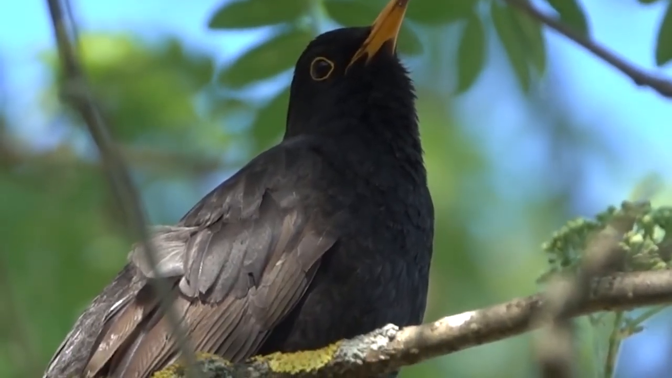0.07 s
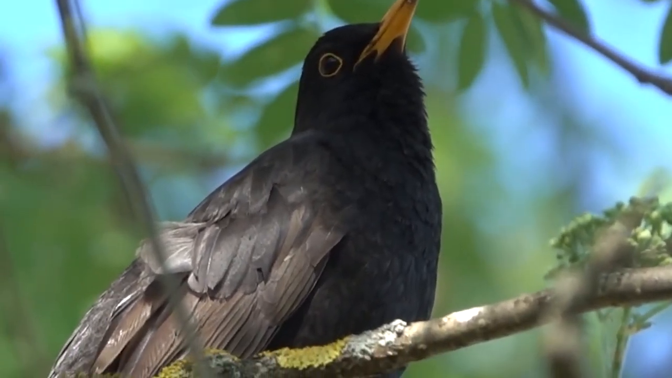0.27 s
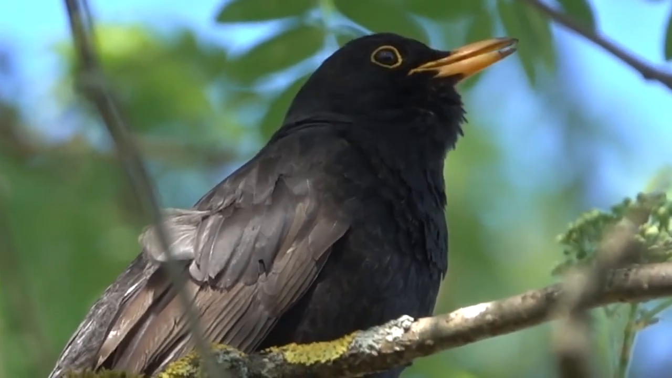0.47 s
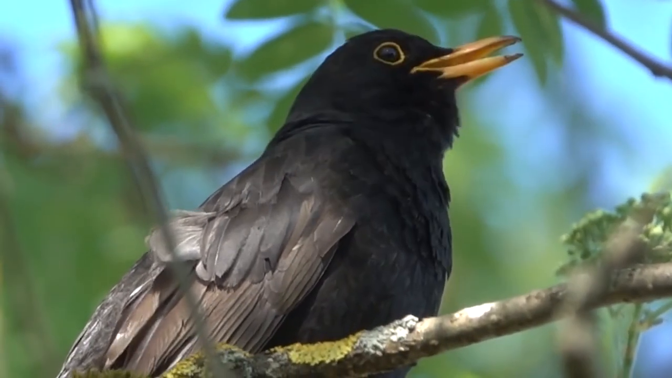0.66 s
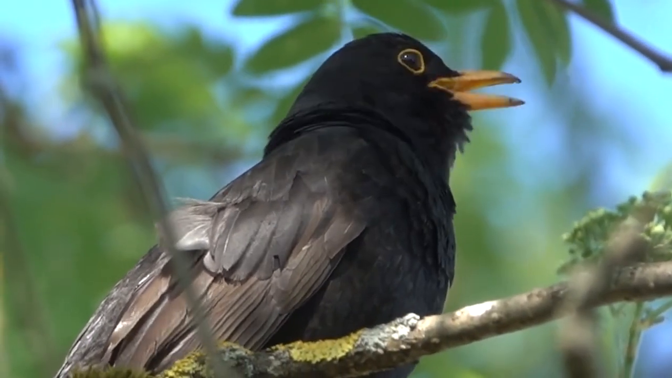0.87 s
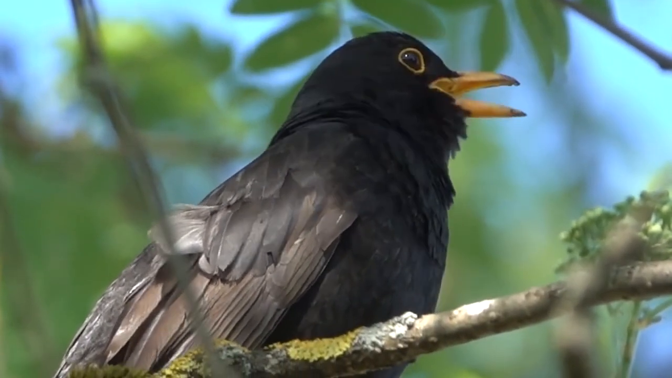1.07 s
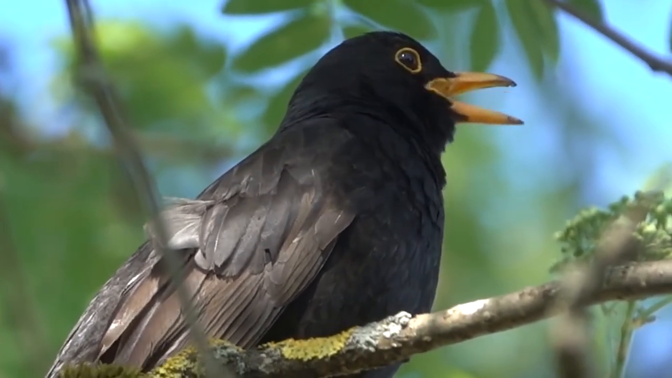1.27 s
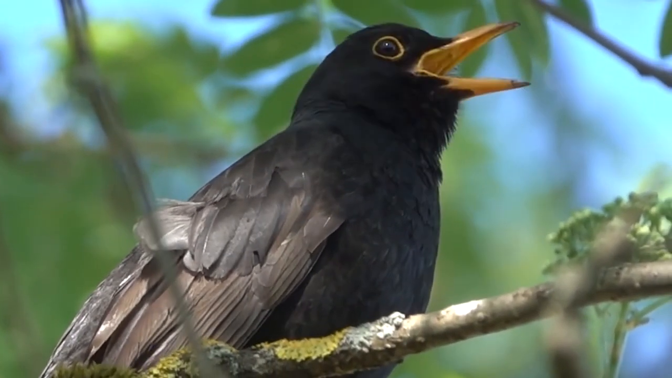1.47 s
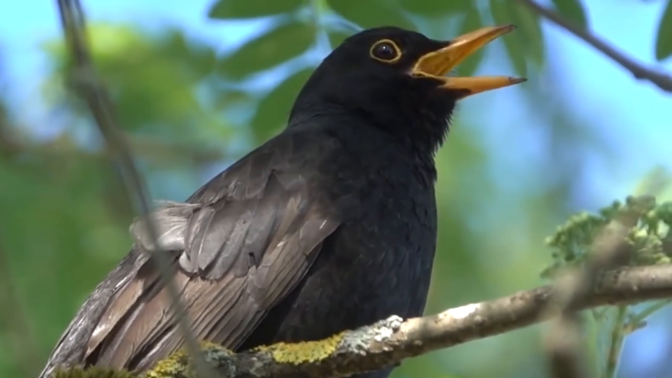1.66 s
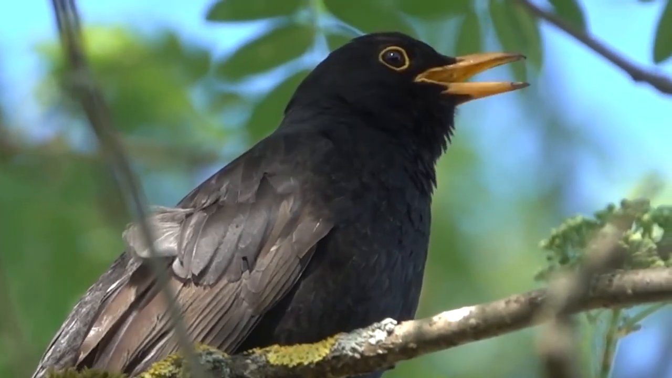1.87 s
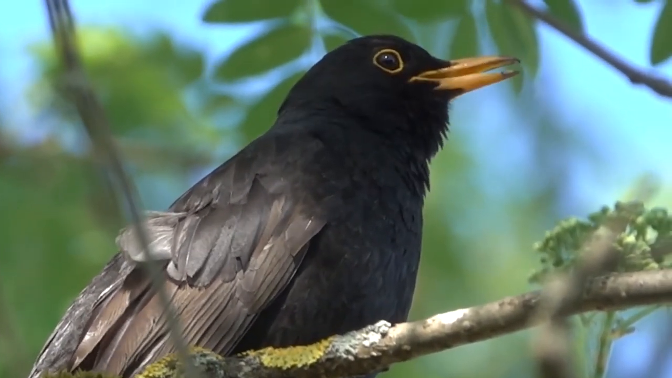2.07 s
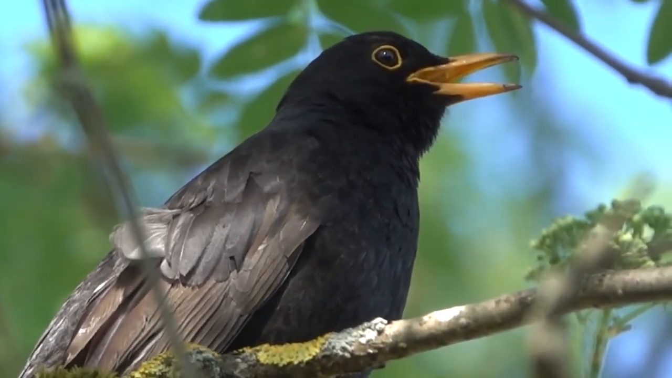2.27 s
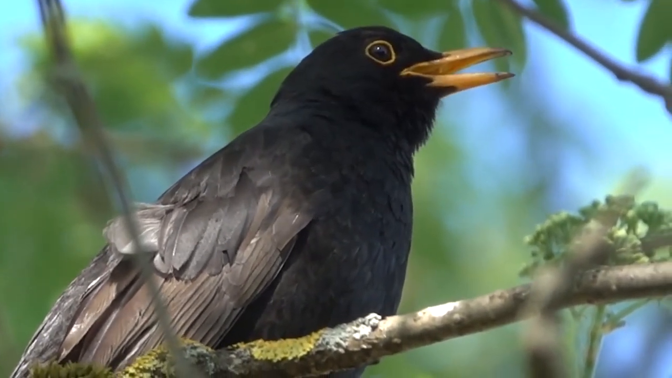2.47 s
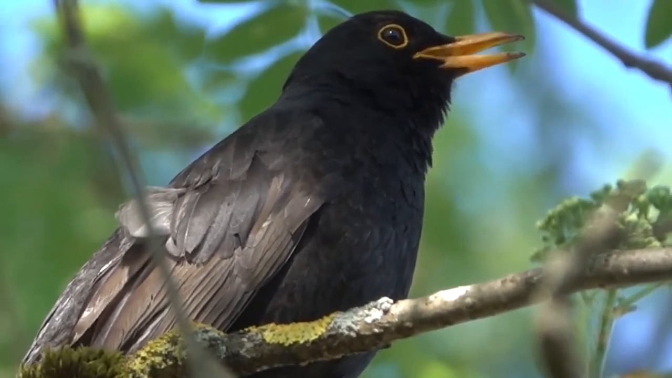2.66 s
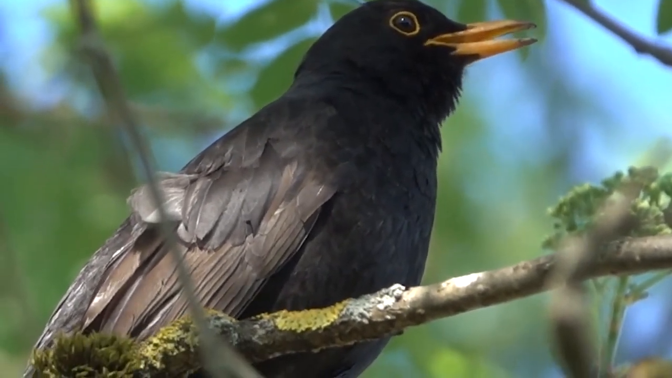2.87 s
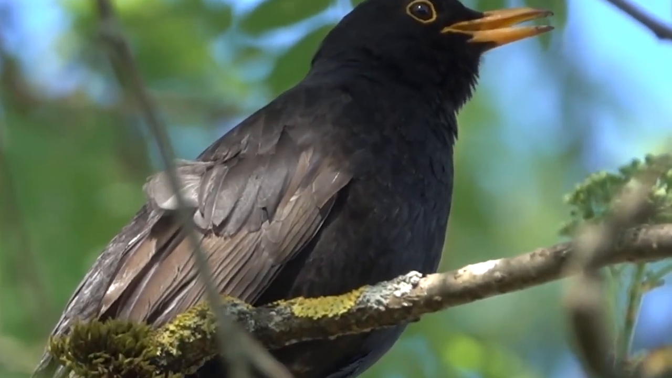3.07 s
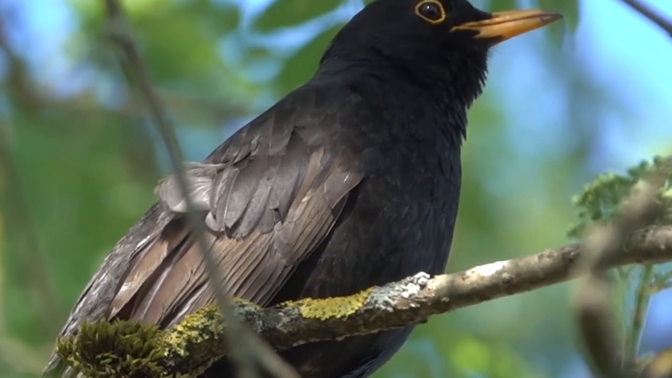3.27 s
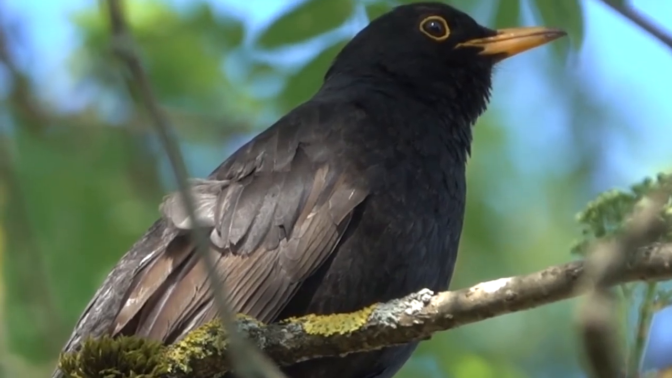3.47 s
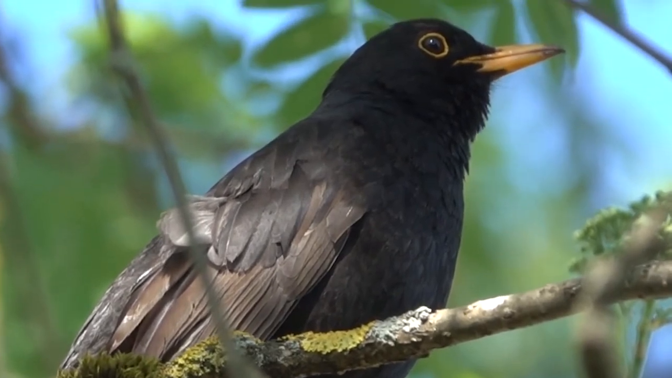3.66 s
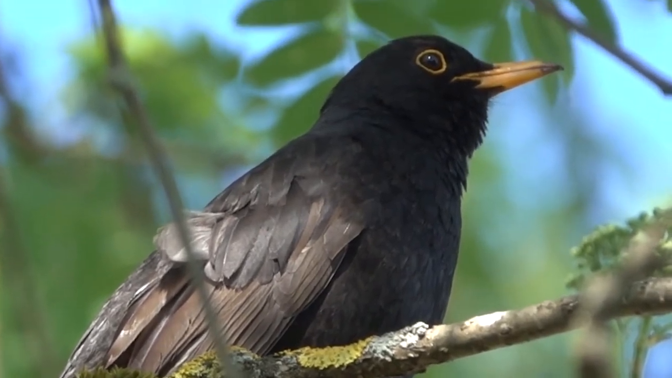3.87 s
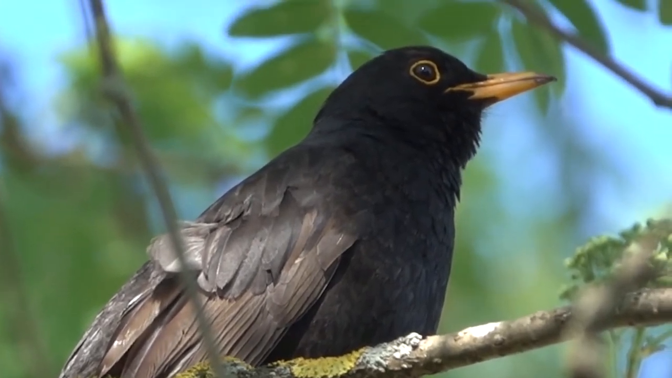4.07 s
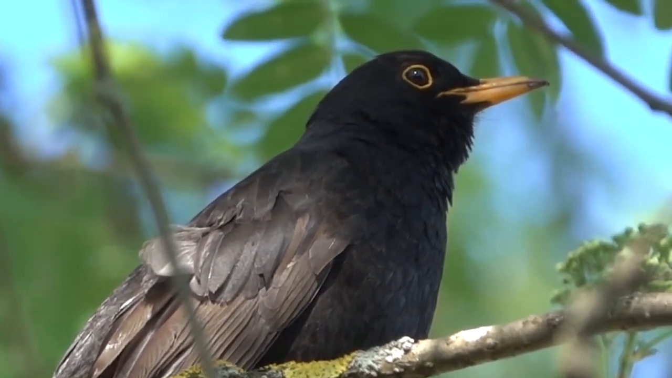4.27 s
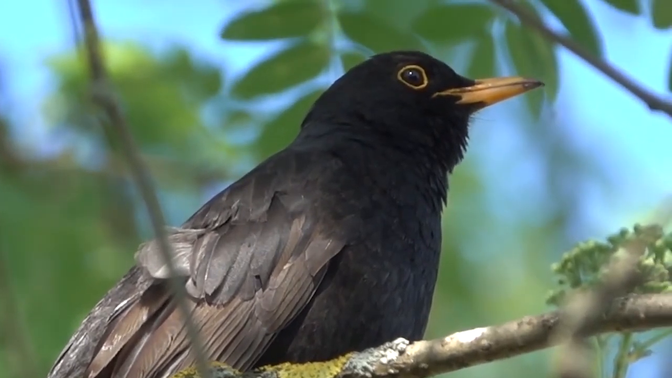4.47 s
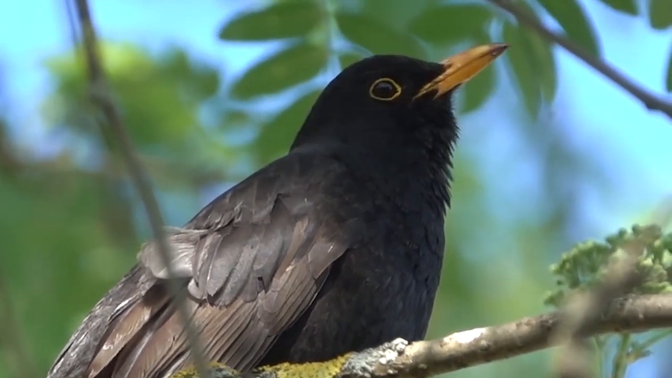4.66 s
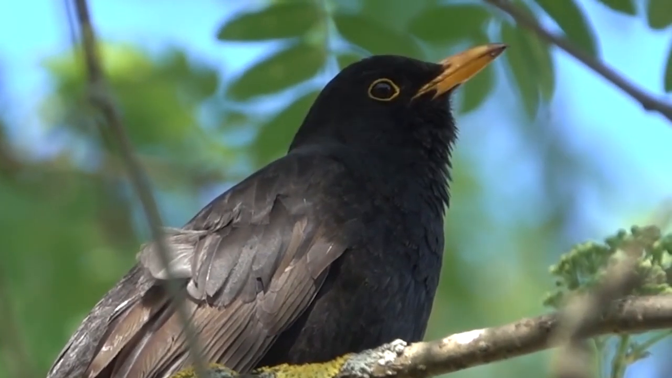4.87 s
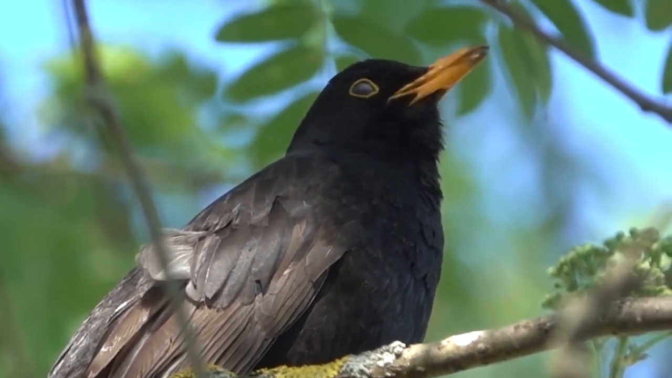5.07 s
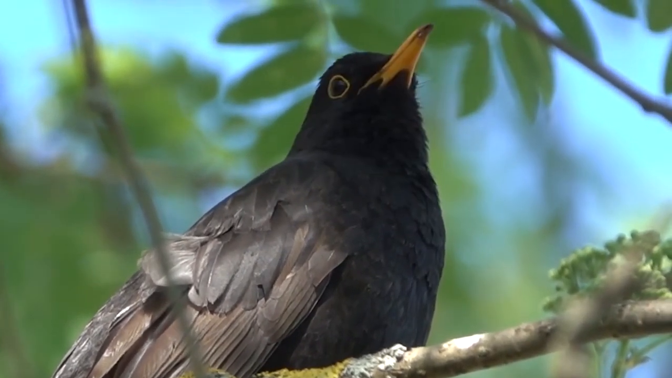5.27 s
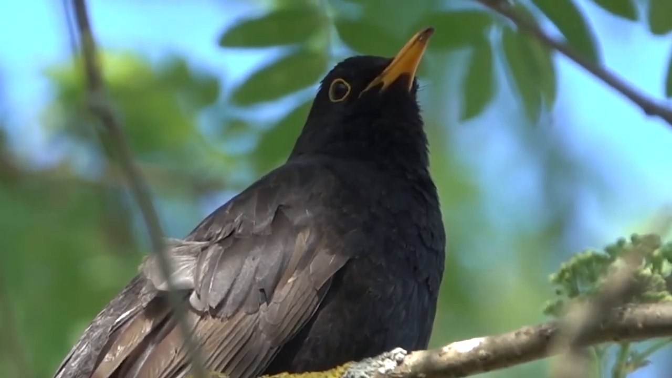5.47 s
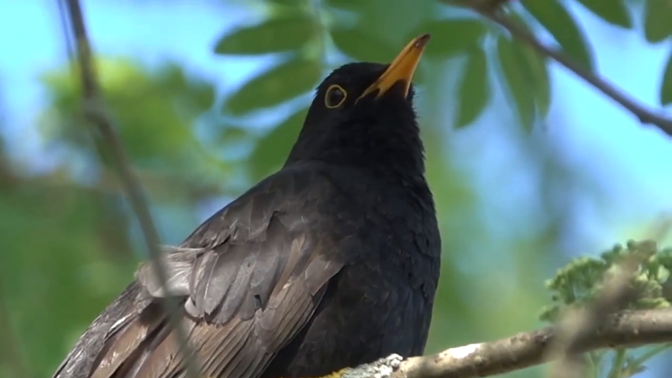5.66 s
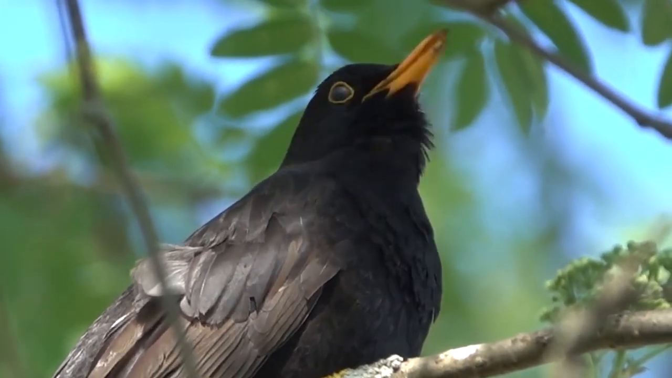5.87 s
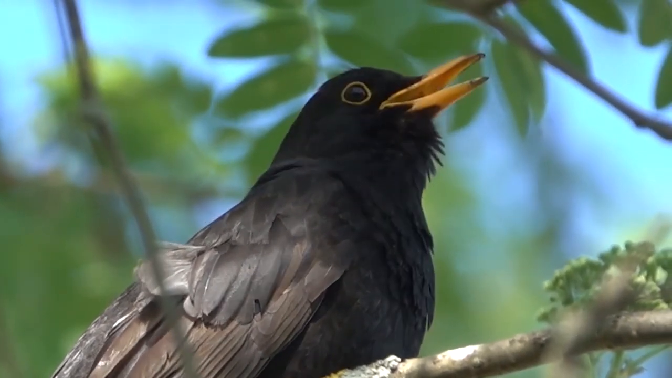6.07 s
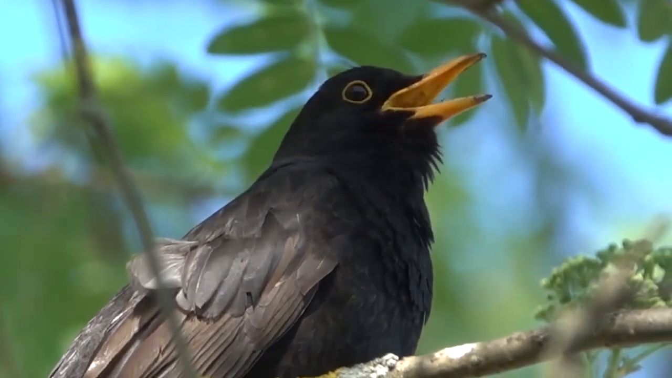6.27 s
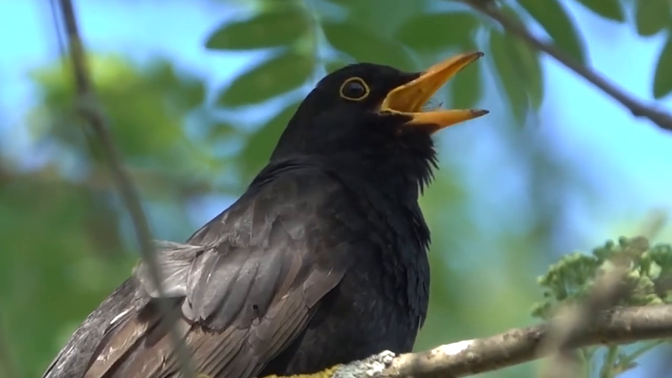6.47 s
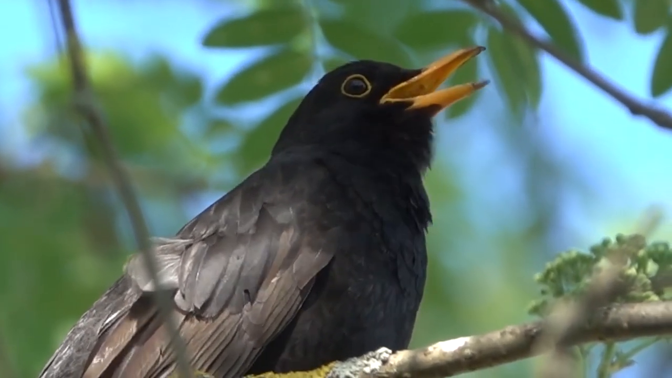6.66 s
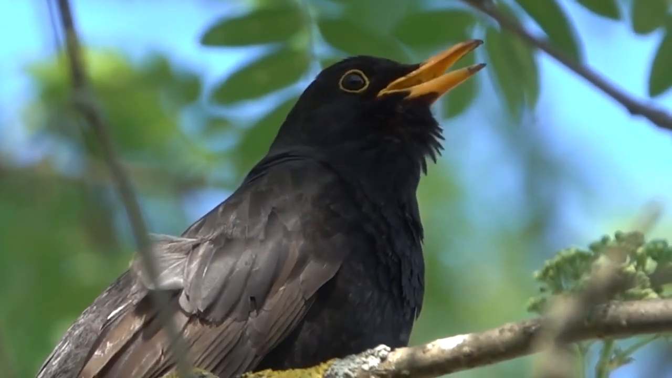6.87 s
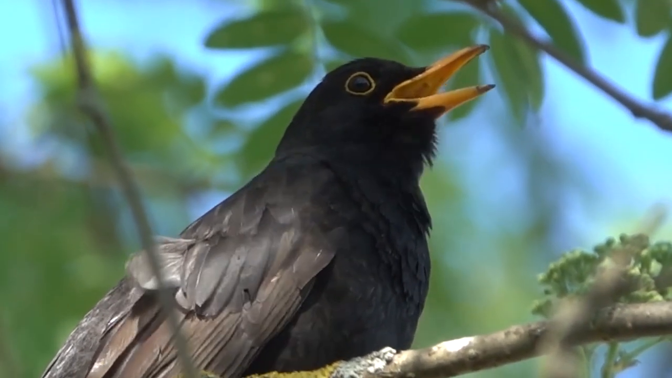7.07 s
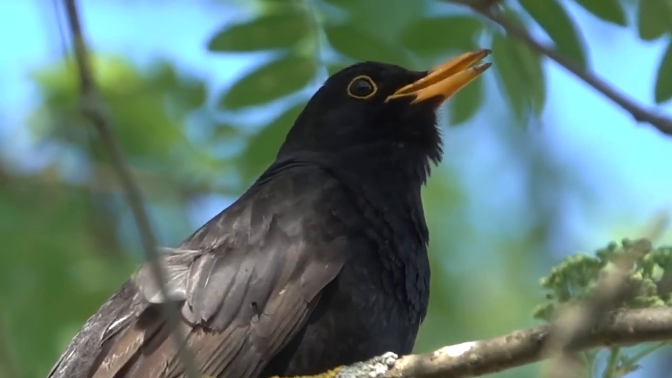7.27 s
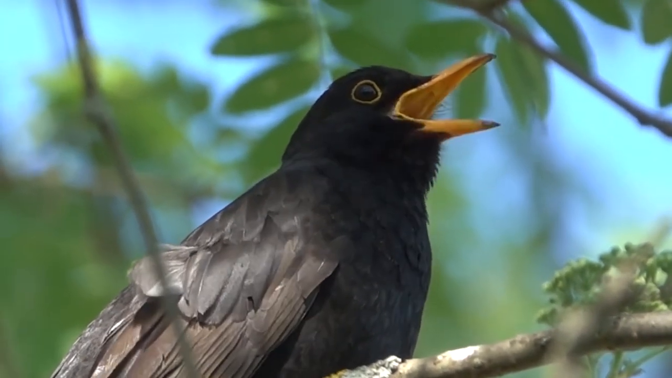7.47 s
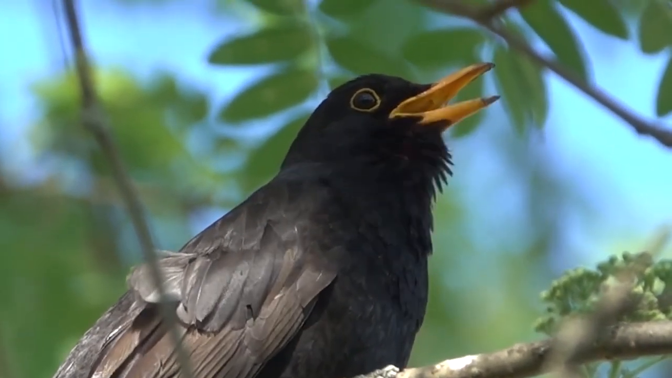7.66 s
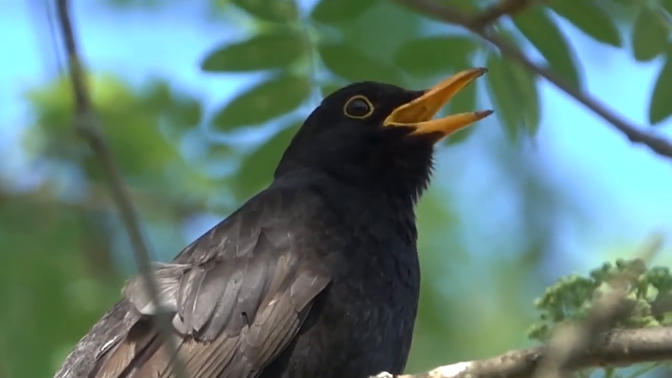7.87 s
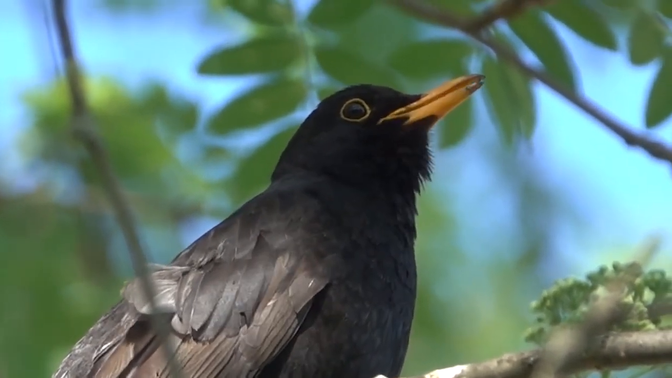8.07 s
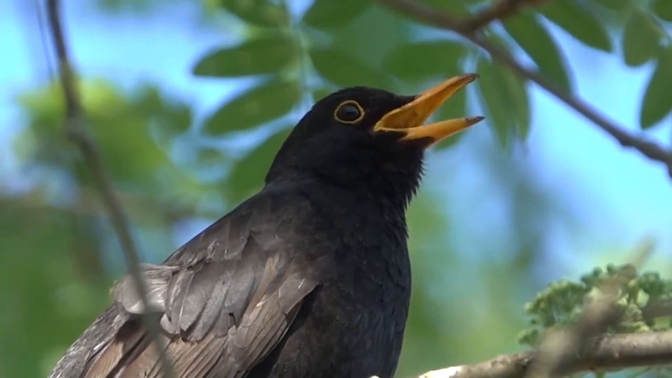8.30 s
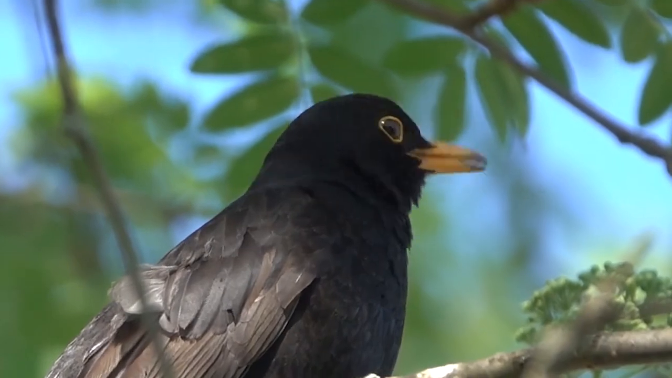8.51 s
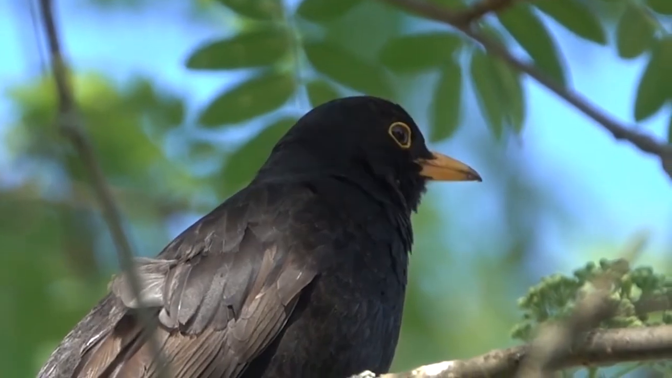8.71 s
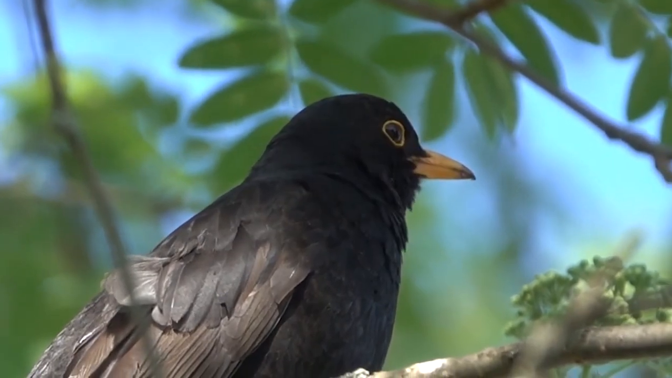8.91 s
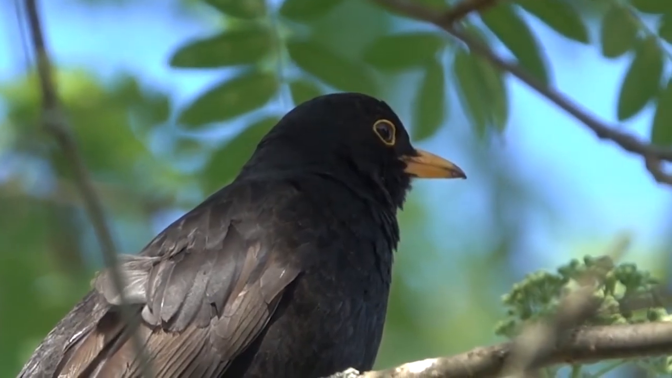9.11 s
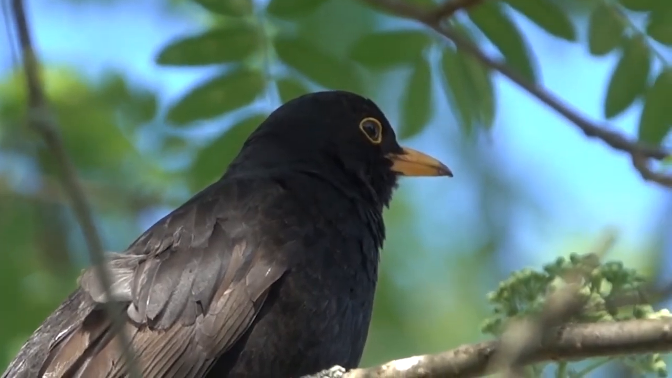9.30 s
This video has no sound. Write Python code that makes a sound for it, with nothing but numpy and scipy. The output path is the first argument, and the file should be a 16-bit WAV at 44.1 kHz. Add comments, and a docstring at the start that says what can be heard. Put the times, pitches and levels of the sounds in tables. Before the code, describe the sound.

A faint, even outdoor hush runs throughout, with small bent whistles and chirps from distant birds blurred by woodland echo. At about 0.5 s a close blackbird begins with mellow, fluty, quavering notes, scooping upward until 1.1 s. After a thin chirp, a hoarse run of rapid squeaks comes at 1.4 to 1.8 s, then a sharp downward slide at 2 s, a fine high trill around 2.4 s, a peaked squeak at 2.6 s and a fading twitter to 3.2 s. Only distant birds are heard until 5.9 s, when a second phrase opens softly; a strong clear flute note follows at 6.3 to 6.5 s, a high falling note, then quavering rolls to 7.3 s. A nasal rise clears near 7.7 s, scratchy chips snap at 7.9 to 8.05 s, and thin high notes end by 8.5 s. Far chirps continue; a tiny dry tick sounds at 9.3 s.

```python
"""A low, even outdoor hush of shaped noise runs throughout, with bent far-off whistles and their wood echo.
From about 0.5 s to 3.2 s a blackbird close by sings fluty, quavering whistles that break into squeaks and trills.
After a pause it sings a second phrase, about 5.9 s to 8.5 s; one dry, ringing tick follows near the end.
The two sides of its syrinx are gliding tones, alone or together; leaves and trunks scatter them into echoes."""
import sys
import numpy as np
from scipy import signal
from scipy.fft import rfft, irfft, next_fast_len
from scipy.io import wavfile
from scipy.ndimage import uniform_filter1d, map_coordinates

SR = 44100
rng = np.random.default_rng(int(sys.argv[2]) if len(sys.argv) > 2 else 0)


def inscribe(sig):
    """Save sig as 16-bit PCM at rate SR to the path in sys.argv[1].

    A 1-D sig is mono; a 2-D sig holds one channel per row.
    Samples are clipped to [-1, 1] before scaling.
    """
    pcm = np.round(np.clip(np.atleast_2d(sig).T, -1, 1) * 32767)
    wavfile.write(sys.argv[1], SR, pcm.astype(np.int16))


N = 411883
TIME = np.arange(N) / SR
TOP_HZ = 11000  # upper limit of the sound

# sung notes of the first phrase, each a contour of: t/s, f/Hz, level/dB
ARCH = [(0.506, 1473, -41.5), (0.51, 1478, -35), (0.552, 1796, -22.5), (0.572, 1896, -27.5),
        (0.614, 1879, -22), (0.636, 1855, -27), (0.662, 1842, -22.5), (0.71, 1783, -20), (0.733, 1740, -33)]
WARBLE = [(0.793, 2020, -42), (0.807, 1910, -26), (0.825, 1710, -20.5), (0.835, 1738, -28.5),
          (0.857, 1757, -19.5), (0.889, 1858, -22), (0.897, 2074, -25.5), (0.935, 2094, -19.5),
          (0.944, 2139, -27.5)]
SCOOP = [(0.992, 2710, -19.5), (1.02, 2317, -16.5), (1.04, 2222, -22), (1.048, 2251, -19.5),
         (1.062, 2489, -18.5), (1.088, 2730, -19), (1.104, 2830, -26.5), (1.112, 2793, -27)]
SQUEAL_LOW = [(1.674, 3370, -32.5), (1.686, 3525, -31), (1.702, 3423, -39), (1.722, 3570, -33.5),
              (1.742, 3543, -36.5), (1.768, 3125, -35.5)]
SQUEAL_HIGH = [(1.68, 7330, -39.5), (1.712, 8200, -40.5), (1.756, 8084, -46), (1.77, 7872, -58)]
SLIDE = [(1.96, 4562, -42), (1.972, 4389, -32), (1.984, 4229, -42), (2.0, 3884, -28), (2.044, 3064, -30),
         (2.056, 3037, -28.5), (2.064, 3400, -30.5), (2.085, 3010, -34)]
PEAKED_SQUEAK = [(2.562, 4000, -54), (2.598, 4420, -39), (2.608, 4563, -50), (2.622, 5390, -37),
                 (2.632, 5240, -39), (2.654, 3930, -34.5), (2.678, 4330, -47), (2.687, 3870, -37)]
# sung notes of the second phrase, each a contour of: t/s, f/Hz, level/dB
OPENING = [(5.865, 2333, -31.5), (5.891, 2587, -30), (5.901, 2437, -24.5), (5.913, 1856, -24),
           (5.947, 1863, -35.5), (5.955, 1785, -24.5), (5.967, 1890, -29.5), (5.975, 1769, -25),
           (6.04, 1845, -29)]
LILT = [(6.05, 2067, -32.5), (6.062, 2148, -25), (6.08, 2116, -17.5), (6.1, 2119, -18.5),
        (6.116, 2156, -30.5), (6.144, 2142, -26.5), (6.185, 1948, -29.5)]
LONG_FLUTE = [(6.31, 2146, -38), (6.318, 2123, -31), (6.354, 2257, -15.5), (6.386, 2300, -11),
              (6.404, 2370, -14.5), (6.426, 2382, -15.5), (6.472, 2362, -13.5), (6.535, 2363, -17)]
HIGH_FALL = [(6.549, 3380, -32.5), (6.571, 3057, -14.5), (6.585, 2976, -20.5), (6.593, 2850, -15.5),
             (6.61, 2810, -27)]
HOOK = [(6.755, 1700, -38.5), (6.775, 1748, -22), (6.795, 1910, -23), (6.805, 2348, -16.5),
        (6.815, 2525, -16), (6.827, 2538, -19.5), (6.837, 2340, -16), (6.843, 2296, -20)]
HIGH_ROLL = [(6.888, 2224, -19), (7.018, 2256, -14.5), (7.08, 2278, -16), (7.088, 2287, -17)]
LOW_ROLL = [(7.156, 1716, -39), (7.172, 1662, -24.5), (7.226, 1713, -22.5), (7.254, 1710, -25),
            (7.264, 1778, -20), (7.294, 1734, -31), (7.312, 1575, -29.5), (7.326, 1518, -31)]
SCRAPE = [(7.521, 2173, -37.5), (7.539, 2357, -30.5), (7.553, 2310, -38)]
NASAL_RISE = [(7.528, 1720, -62), (7.544, 1785, -39), (7.552, 1786, -45), (7.56, 1720, -33.5),
              (7.59, 2023, -36.5), (7.62, 2066, -48), (7.632, 2115, -32.5), (7.672, 2125, -29)]
CLEAR_RISE = [(7.68, 2227, -21), (7.688, 2155, -30.5), (7.698, 2288, -16), (7.768, 2570, -24),
              (7.808, 2796, -22.5), (7.814, 2733, -22.5), (7.838, 2618, -22.5)]
STEP_UP = [(8.228, 3230, -44.5), (8.274, 3270, -32), (8.288, 3450, -29.5), (8.296, 3890, -29.5),
           (8.314, 4050, -29.5), (8.328, 4040, -31.5)]
THIN_RISE = [(8.361, 4340, -32), (8.391, 4428, -30), (8.467, 4480, -30.5), (8.481, 4564, -36.5),
             (8.523, 4880, -40), (8.542, 4820, -41)]
THIN_TOP = [(8.235, 7672, -53), (8.271, 7600, -39.5), (8.307, 7820, -39), (8.331, 7940, -50),
            (8.427, 7990, -45.5), (8.457, 8320, -53), (8.533, 8042, -44.5)]


def undb(db):
    """Decibels to gain."""
    return 10 ** (np.asarray(db) / 20)


def unit(x):
    """Scale to rms 1."""
    return x / np.sqrt(np.mean(x ** 2))


def colour(hz, points):
    """Gain of a (Hz, dB) spectrum at the given frequencies."""
    f, db = np.transpose(points)
    return undb(np.interp(np.log(np.maximum(hz, 1)), np.log(f), db))


def walk(size, rate):
    """Smooth chance with a spread near 1 that changes about rate times a second."""
    knots = rng.standard_normal(int(size * rate / SR) + 4)
    return map_coordinates(knots, [np.arange(size) * rate / SR], order=3, mode="nearest")


def fade(t, edge_s):
    """Soft opening and closing of a note."""
    to_edge = np.minimum(t - t[0], t[-1] - t)
    return np.sin(np.pi / 2 * np.clip(to_edge / edge_s, 0, 1)) ** 2


def add(track, start_s, x):
    """Mix x into the track from the given time on."""
    i = int(np.clip(start_s * SR, 0, N))
    track[i:i + len(x)] += x[:N - i]


def spread(mid, side):
    """Left and right from mid and side."""
    return np.array([mid + side, mid - side])


def high_pass(order, hz):
    """Sections of a filter that drops everything low."""
    return signal.butter(order, hz, "high", fs=SR, output="sos")


def hush(level_db=-62, width=0.5):
    """Even outdoor background: steady noise shaped in frequency, mostly alike in both ears."""
    # spectrum of the hush: f/Hz, relative level/dB
    hush_curve = [(30, -30), (100, -30), (175, -24.5), (250, -15), (320, -7), (385, -12), (460, -5),
                  (700, -7.5), (900, 0), (1150, -7), (1420, -12.5), (2000, -9.5), (3000, -14),
                  (3900, -21.5), (7000, -25), (11000, -28)]
    size = next_fast_len(N)
    noise = spread(rng.standard_normal(size), width * rng.standard_normal(size))
    hz = np.arange(size // 2 + 1) * SR / size
    shaped = irfft(rfft(noise) * colour(hz, hush_curve), size)[:, :N]
    return unit(shaped) * undb(level_db)


def trees(x, low_t60, high_t60, width):
    """Countless weak echoes from trunks and leaves: decaying noise whose treble has its own, shorter decay."""
    t = np.arange(2 * SR) / SR
    noise = spread(rng.standard_normal(len(t)), width * rng.standard_normal(len(t)))
    low = signal.sosfiltfilt(signal.butter(2, 4200, fs=SR, output="sos"), noise)
    low_tail = low * undb(-60 * t / low_t60)
    high_tail = undb(3.5) * (noise - low) * undb(-60 * t / high_t60)
    tail = (low_tail + high_tail) * (1 - np.exp(-t / 0.0017))  # soft onset
    # level set by the energy of the low part, whatever its decay
    tail /= np.sqrt(np.sum(np.mean(low ** 2) * undb(-120 * t / low_t60) * SR / 8400))
    return signal.fftconvolve(x[None], tail, axes=1)[:, :N]


def branches(x, reach_s, count=60):
    """Early echoes off the nearest branches and leaves, on the whole weaker the later they come."""
    echoes = np.zeros((2, SR // 4))
    for delay, size, side in rng.random((count, 3)):
        i = int((0.0039 + reach_s * delay) * SR)
        pan = 1 + np.array([1, -1]) * (2 * side - 1)
        echoes[:, i] += (2 * size - 1) * np.exp(-3 * delay) * pan
    echoes /= np.sqrt(np.sum(echoes ** 2) / 2)
    return signal.fftconvolve(x[None], echoes, axes=1)[:, :N]


def hoarseness(t):
    """Irregular vibration of the membranes: a phase wobble and a gain flutter, none on clear notes."""
    # hoarse stretches of the voice: start/s, end/s, roughness 0-1
    hoarse_spans = [(.456, .496, .44), (1.384, 1.414, 0.4), (1.42, 1.596, 0.34), (1.64, 1.682, 0.27),
                    (2.035, 2.105, 0.23), (2.638, 2.716, 0.15), (6.803, 6.86, .07), (7.152, 7.342, 0.08),
                    (7.504, 7.554, 0.26), (7.565, 7.735, 0.06), (7.806, 7.86, 0.09), (7.88, 8.06, 0.37)]
    rough = np.zeros(len(t))
    for start, end, amount in hoarse_spans:
        rough[(t > start) & (t < end)] = amount
    rough = uniform_filter1d(rough, size=150)
    wobble = rough * walk(len(t), 1100)
    flutter = (1 + rough * walk(len(t), 1500)) / np.sqrt(1 + rough ** 2)
    return wobble, flutter


def chirp(length, pitches, octave_db, jitter, edge, start_s=0):
    """A short whistle bent through three pitches; it turns hoarse within a hoarse stretch."""
    t = np.arange(0, length, 1 / SR)
    hz = np.polyval(np.polyfit([0, .5, 1], pitches, deg=2), t / t[-1])
    wobble, flutter = hoarseness(start_s + t)
    phase = 2 * np.pi * np.cumsum(hz * (1 + jitter * walk(len(t), 400))) / SR + wobble
    tone = np.sin(phase) + undb(octave_db) * np.sin(2 * phase)
    return unit(tone * flutter * fade(t, edge * t[-1]))


def far_whistles():
    """Single calls, and one bird's repeated falling chirp, as short bent tones."""
    # far whistles: t/s, length/s, start f/Hz, middle f/Hz, end f/Hz, level ahead of the distance gains/dB
    far_calls = [(0.142, .09, 1790, 1704, 1614, -53), (0.244, 0.14, 1632, 2187, 2896, -53),
                 (0.396, 0.078, 1800, 1677, 1610, -55), (2.832, 0.018, 2340, 2277, 2200, -54),
                 (2.981, 0.082, 2293, 2140, 2140, -58), (3.554, 0.049, 2530, 2610, 2550, -62.5),
                 (3.632, 0.16, 2035, 1836, 1900, -63.5), (3.891, 0.11, 2184, 2146, 1910, -59),
                 (4.326, .115, 2750, 2340, 3210, -60.5), (4.432, 0.058, 3340, 3550, 3860, -64),
                 (4.445, 0.045, 1920, 2180, 2095, -55), (4.598, .14, 2140, 2002, 1795, -57),
                 (4.96, .115, 3080, 2570, 2234, -55.5), (5.042, 0.092, 2317, 2224, 2210, -50),
                 (5.067, 0.14, 2500, 2494, 2670, -65.5), (5.255, .04, 1790, 1720, 1705, -59.5),
                 (5.3, .2, 1844, 1780, 1724, -60.5), (5.723, .15, 5080, 4610, 4490, -67),
                 (6.519, .12, 1747, 1856, 1510, -52.5), (7.375, 0.11, 1780, 1976, 1702, -48),
                 (8.119, 0.33, 2006, 1834, 1832, -51.5), (8.479, 0.084, 1676, 1577, 1525, -57.5),
                 (8.746, 0.018, 2330, 2510, 2260, -52), (8.843, 0.022, 2128, 2087, 2050, -55.5),
                 (8.9, 0.019, 2530, 2500, 2520, -54), (9.198, 0.15, 1502, 1670, 1864, -55)]
    # one bird's repeated chirp: t/s, level ahead of the distance gains/dB
    far_chirps = [(0, -67), (3.9, -74), (5.018, -74), (5.26, -78), (5.639, -69.5), (8.646, -60),
                  (8.798, -63), (8.883, -60.5)]
    chirp_s, chirp_hz = 0.091, (3303, 3090, 2960)
    calls = np.zeros(N)
    repeats = [(s, chirp_s, *chirp_hz, db) for s, db in far_chirps]
    for s, length, *pitches, db in far_calls + repeats:
        add(calls, s, undb(db) * chirp(length, pitches, octave_db=-31.5, jitter=0.02, edge=0.099))
    return calls


def far_blurs():
    """Very distant calls: noise narrowed to a band around one pitch."""
    # blurred calls: start/s, end/s, f/Hz, rate of change/Hz, level ahead of the distance gains/dB
    blurs = [(1.434, 2.009, 1163, 90.9, -60), (2.555, 2.955, 1092, 151.6, -64),
             (8.489, 8.698, 948, 88.4, -63.5)]
    calls = np.zeros(N)
    for start, end, hz, width_hz, db in blurs:
        t = np.arange(start, end, 1 / SR)
        envelope = walk(len(t), width_hz) + 1j * walk(len(t), width_hz)
        band = envelope * np.exp(2j * np.pi * hz * t)
        add(calls, start, undb(db) * band.real * fade(t, 0.021))
    return calls


def far_chorus(count=64, softest_db=-66.5, shortest_s=.025, spread_s=.12):
    """The furthest birds: soft bent whistles at random times and pitches."""
    chorus = np.zeros(N)
    for when, length, height, bend, loud in rng.random((count, 5)):
        pitches = (1850 + 1350 * height) * (1 + (bend - .6) * np.array([-.2, 0, .1]))
        call = chirp(shortest_s + spread_s * length, pitches, octave_db=-40.5, jitter=0.008, edge=0.37)
        add(chorus, when * N / SR, undb(softest_db) * (1 + loud) * call)
    return chorus


def far_birds(direct_db=-2, wood_db=-3):
    """Distant calls half lost in the wood's echo; of the furthest chorus only the echo arrives."""
    calls = far_whistles() + far_blurs()
    echo = trees(calls + far_chorus(), low_t60=0.72, high_t60=0.61, width=0.59)
    return undb(direct_db) * calls + undb(wood_db) * echo


def tick(start_s=9.265, db=-39, crack_db=-9):
    """A dry tick, as of a twig: a tiny noise crack and a few short decaying modes."""
    # modes of the tick: f/Hz, relative level/dB, t60/s
    modes = [(1070, -2.5, .035), (1760, -2, 0.045), (2650, 5.5, 0.008), (3050, -3, 0.03)]
    t, out = TIME[:SR // 10], np.zeros(N)
    ring = sum(undb(gain_db - 60 * t / t60) * np.sin(2 * np.pi * hz * t) for hz, gain_db, t60 in modes)
    crack = undb(crack_db) * rng.standard_normal(len(t)) * np.exp(-t / 0.0028)
    add(out, start_s, undb(db) * signal.sosfilt(high_pass(1, 500), ring + crack))
    return out


def chips():
    """Slurs, trills and snaps as short whistles: (s, length s, three pitches Hz, level dB)."""
    # single thin slurs: t/s, length/s, start f/Hz, middle f/Hz, end f/Hz, level/dB
    slurs = [(.461, 0.017, 2760, 2590, 2190, -50), (.475, 0.0086, 2580, 2250, 2080, -40),
             (.486, 0.008, 2100, 2350, 2640, -36.5), (1.232, 0.048, 3500, 4450, 4210, -58),
             (1.34, 0.048, 8430, 8560, 8500, -54), (1.368, 0.019, 8560, 8050, 5900, -45),
             (1.921, 0.012, 2330, 3380, 5000, -45), (1.935, 0.013, 5160, 5070, 5000, -37),
             (2.308, 0.044, 6800, 7370, 7380, -55), (2.625, 0.033, 2650, 2625, 2520, -55.5),
             (2.698, 0.039, 7400, 6720, 6160, -46), (3.1, 0.061, 4770, 4620, 4430, -57),
             (3.122, 0.06, 8300, 7140, 6600, -55)]
    # trills of like chips: start/s, end/s, period/s, chip length/s, start f/Hz, middle f/Hz, end f/Hz,
    # climb/(Hz per s), level at mid-trill ahead of the scatter/dB
    trills = [(2.348, 2.522, .0242, .017, 5420, 7060, 6740, -1800, -45.5),
              (2.864, 3.081, 0.035, 0.0204, 3650, 4490, 4350, 2396, -49),
              (2.913, 3.11, 0.034, 0.021, 9200, 8020, 7260, 405, -57)]
    # sharp two-voiced down-chips: t/s, level of the lower voice/dB
    snaps = [(7.883, -26), (7.967, -32), (8.032, -33.5)]
    snap_hz, snap_upper_hz = (4256, 3090, 2618), (5990, 4900, 3970)  # at start, middle and end
    snap_s, snap_lag_s, snap_upper_db = .019, .0105, -41
    rows = list(slurs)
    for start, end, period, length, start_hz, middle_hz, end_hz, climb, db in trills:
        for s in np.arange(start, end, period):
            off = s - (start + end) / 2
            edge = (2 * off / (end - start)) ** 2
            # towards the ends of a trill the chips tend to start nearer their middle pitch
            shallow = .36 * edge + .25 * rng.standard_normal()
            pitches = np.array([start_hz + shallow * (middle_hz - start_hz), middle_hz, end_hz])
            # weaker at both ends, fading by 30 dB per s, with uneven loudness
            shape_db = -4.5 * edge - 30 * off + 1.9 * rng.standard_normal()
            rows.append((s, length, *(pitches + climb * off), db + shape_db))
    for s, db in snaps:
        rows.append((s, snap_s, *snap_hz, db))
        rows.append((s + snap_lag_s, snap_s, *snap_upper_hz, snap_upper_db))
    return rows


def syllable(note, octave_db, upper_db, nasal_steady=0.75, follow=0.54):
    """Rows (s, Hz, dB, octave rel. dB, overtones rel. dB): loud is pure; nasal notes hold overtones steadier."""
    s, hz, db = np.transpose(note)
    below_peak_db = db - db.max()
    nasal = min(undb(octave_db - db.max()), 1)
    # follow: dB that the overtones gain per dB of a clear note
    rel_db = follow * (1 - nasal_steady * nasal) * below_peak_db - db
    return np.transpose([s, hz, db, octave_db + rel_db, upper_db + rel_db])


def sung(note, bend_hz, octave_db, upper_db):
    """A note with a quick attack and a release in which the pitch bends away."""
    attack_s, attack_db = .007, -14.5
    release_s, release_db = 0.0057, -10
    first = note[0] + np.array([-attack_s, 0, attack_db])
    last = note[-1] + np.array([release_s, bend_hz, release_db])
    return syllable(np.vstack([first, note, last]), octave_db, upper_db)


def squeak(start, length, start_hz, end_hz, db, octave_db, held_hz, ratio=1, count=24):
    """A squeak drops onto its pitch, sags and flicks away; it swells unevenly and is weaker while it glides."""
    t = np.linspace(0, length, count)
    drop, flick = np.exp(-t / .0052), np.exp((t - length) / 0.00419)
    held = held_hz - 4880 * t  # sag in Hz per s
    hz = ratio * (held + (start_hz - held) * drop + (end_hz - held) * flick)
    swell_db = 50 * (t - length / 2)
    glide_db = -9 * (drop + flick)
    flicker_db = 4.6 * rng.standard_normal(count)
    note = np.transpose([start + t, hz, db + swell_db + glide_db + flicker_db])
    return syllable(note, octave_db, upper_db=-59)


def score(held_hz=3342, under_ratio=.82, under_share=0.53, under_octave_db=-16):
    """The syllables of the leading side and of the other side, which sounds lower and shorter in squeaks."""
    # leading side: note, pitch bend on release/Hz, octave level/dB, higher overtones ahead of the
    # voice's trim/dB; overtones at the note's loudest
    lead_notes = [(ARCH, -69, -56, -62), (WARBLE, 40, -57.5, -57), (SCOOP, -100, -53, -58),
                  (SQUEAL_HIGH, 60, -70, -74), (SLIDE, -250, -52.5, -61), (PEAKED_SQUEAK, 1800, -60, -64),
                  (OPENING, 100, -59.5, -62), (LILT, -45.5, -57.5, -56), (LONG_FLUTE, 510, -51, -57),
                  (HIGH_FALL, 65, -49, -71), (HOOK, -800, -53, -55.5), (HIGH_ROLL, -120, -59, -56.5),
                  (LOW_ROLL, -60, -53.5, -56.5), (NASAL_RISE, 61, -29.5, -48.5),
                  (CLEAR_RISE, -350, -53.5, -54), (STEP_UP, 74, -55, -70), (THIN_RISE, -120, -60, -66)]
    # other side: note, pitch bend on release/Hz, octave level/dB, higher overtones ahead of the
    # voice's trim/dB; overtones at the note's loudest
    second_notes = [(SQUEAL_LOW, -1300, -49, -51), (SCRAPE, -250, -40.5, -63), (THIN_TOP, -1200, -70, -74)]
    # run of squeaks: t/s, length/s, start f/Hz, end f/Hz, level/dB, octave/dB, other side/dB;
    # levels ahead of swell and flicker
    squeaks = [(1.387, 0.0612, 5610, 3230, -31.5, -44.5, -49), (1.452, 0.064, 4114, 4900, -31, -43.5, -31),
               (1.519, 0.058, 4440, 3950, -32.5, -42.5, -40.5), (1.58, .058, 3713, 5620, -28.5, -37.5, -34),
               (1.641, 0.028, 4510, 5330, -31, -47, -28)]
    lead = [sung(*row) for row in lead_notes]
    second = [sung(*row) for row in second_notes]
    for s, length, start_hz, end_hz, db, octave_db, under_db in squeaks:
        lead.append(squeak(s, length, start_hz, end_hz, db, octave_db, held_hz))
        under = squeak(s, under_share * length, start_hz, held_hz, under_db,
                       under_db + under_octave_db, held_hz, under_ratio)
        second.append(under)
    return lead, second


def quaver(t):
    """Pitch swing and gain of the fast flutter: the tone is loudest at the top of each swing."""
    # fast quavers of the voice: start/s, end/s, rate/Hz, pitch swing/Hz, loudness dip 0-1
    quavers = [(0.505, 0.543, 54.7, 60, 0.64), (0.834, 0.944, 59.3, 123, 0.6),
               (1.055, 1.123, 162.6, 150, 0.22), (2.037, 2.102, 131.2, 420, 0),
               (2.64, 2.7, 112.5, 199, 0.6), (5.908, 6.045, 43.8, 126, 0.47),
               (6.133, 6.193, 96.3, 60.5, 0.16), (6.879, 6.969, 45.5, 69.4, 0.93),
               (6.97, 7.089, 33.6, 119.4, 0.43), (7.172, 7.297, 71.1, 68.6, 0.83),
               (8.205, 8.293, 69, 29.9, 0.84), (7.8, 7.838, 141.5, 90, .3), (8.352, 8.489, 58, 39.3, .85)]
    swing, gain = np.zeros(len(t)), np.ones(len(t))
    for start, end, rate, swing_hz, dip in quavers:
        on = (t > start) & (t < end)
        cycle = -np.cos(2 * np.pi * rate * (t[on] - start))
        swing[on] = swing_hz * cycle
        gain[on] = (1 - dip * ((1 - cycle) / 2) ** 2) / (1 - dip * 0.14)
    return uniform_filter1d(swing, size=60), uniform_filter1d(gain, size=60)


def syrinx(syllables, jitter, overtone_db, rasp):
    """One side of the syrinx: a gliding, nearly pure tone with weak, slightly smeared overtones."""
    # how throat and open beak pass the higher overtones: f/Hz, gain/dB
    beak_curve = [(3000, -12), (4400, -7), (5300, -3.5), (6200, -6), (7100, -5), (7700, -13), (9300, 3.5),
                  (10500, 7)]
    throat_db, throat_hz = -9, 2850
    nasal_tilt_db, flute_tilt_db = 9, 0.5
    out = np.zeros(N)
    for rows in syllables:
        s, *columns = np.transpose(rows)
        s = np.sort(s)
        t = np.arange(s[0], s[-1], 1 / SR)
        hz, db, octave_db, upper_db = (uniform_filter1d(np.interp(t, s, c), size=160) for c in columns)
        swing, gain = quaver(t)
        wobble, flutter = hoarseness(t)
        hz = (hz + swing) * (1 + jitter * walk(len(t), 500))
        phase = 2 * np.pi * np.cumsum(hz) / SR + wobble
        # uneven closing of the membranes smears the overtones, most of all in quavers and quick glides
        gliding = np.tanh(abs(np.gradient(uniform_filter1d(hz, size=300))) * SR / 12000)
        unrest = (rasp + 0.27 * np.maximum(gliding, abs(swing) > 1)) * walk(len(t), 1200)
        octave = np.sin(2 * phase + 3 * unrest) * (2 * hz < TOP_HZ)
        tone = np.sin(phase) + undb(octave_db) * octave
        # hoarse stretches also stir a broad resonance of the throat
        tone += undb(throat_db) * wobble * np.sin(2 * np.pi * throat_hz * t)
        # nasal notes favour the lower overtones, fluty ones the top
        tilt_db = nasal_tilt_db * np.minimum(undb(octave_db), 1) - flute_tilt_db
        for k in range(3, 7):
            level = undb(upper_db + overtone_db - tilt_db * (k - 4.5)) * colour(k * hz, beak_curve)
            tone += level * np.sin(k * (phase + unrest)) * (k * hz < TOP_HZ)
        add(out, s[0], np.sqrt(2) * tone * undb(db) * gain * flutter * fade(t, 0.0013))
    return out


def blackbird(coupling_db=-11, air_db=-23):
    """Both sides of the syrinx and the chips; a little hiss rides on the squeaks."""
    lead_syllables, second_syllables = score()
    lead = syrinx(lead_syllables, jitter=0.0058, overtone_db=-1.5, rasp=0.023)
    second = syrinx(second_syllables, jitter=0.0029, overtone_db=-6.5, rasp=0.076)
    # sounding together, the two sides modulate each other and give a sum tone
    lead_z, second_z = signal.hilbert(np.array([lead, second]), next_fast_len(N))[:, :N]
    sum_tone = np.real(lead_z * second_z) / (abs(lead_z) + abs(second_z) + 1e-6)
    song = lead + second + undb(coupling_db) * sum_tone
    for s, length, *pitches, db in chips():
        chip = chirp(length, pitches, octave_db=-19.5, jitter=0.014, edge=0.1, start_s=s)
        add(song, s, undb(db) * chip)
    # the hiss follows the forced, high notes; the flute tones stay clean
    high_notes = signal.sosfiltfilt(high_pass(8, 3200), song)
    force = np.sqrt(np.maximum(uniform_filter1d(high_notes ** 2, size=200), 0))
    air = signal.sosfilt(high_pass(2, 2200), rng.standard_normal(N))
    return song + undb(air_db) * air * force


def scene():
    """The near bird with its echoes, among the far birds and the hush."""
    # left-right balance of the song, wavering as reflected sound interferes, one list per phrase:
    # t/s, left minus right/dB
    balance_sway = [
        [(0.47, -5.5), (0.61, 7.5), (0.72, -1), (0.86, 2.5), (0.93, -4.0), (1.31, -3.5), (1.39, -3.5),
         (2.01, -2.5), (2.04, -4), (2.41, 4), (2.65, -4), (3.15, -2)],
        [(5.88, -4.5), (6.01, 2), (6.11, -6), (6.21, 0), (6.43, -8.0), (6.73, 2.0), (6.9, -7.0), (7.21, -2.5),
         (8.09, -3), (8.14, -8.5), (8.4, 1.5), (8.54, -6.5)],
    ]
    # the throat radiates next to nothing below the lowest notes
    song = signal.sosfiltfilt(high_pass(6, 1250), blackbird())
    balance_db = np.interp(TIME, *np.vstack(balance_sway).T)
    direct = song * undb(np.array([balance_db, -balance_db]) / 2)
    early = undb(-13) * branches(song, reach_s=0.047)
    tail = undb(-13) * trees(song, low_t60=1.14, high_t60=0.49, width=0.67)
    return hush() + far_birds() + tick() + tail + early + direct


def record(dry):
    """A steep low-pass cuts the top."""
    return signal.sosfilt(signal.ellip(10, .2, 70, TOP_HZ, fs=SR, output="sos"), dry)


dry = scene()
out = record(dry)
inscribe(out)
```